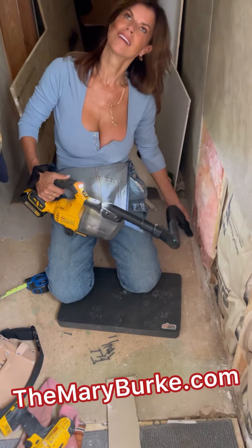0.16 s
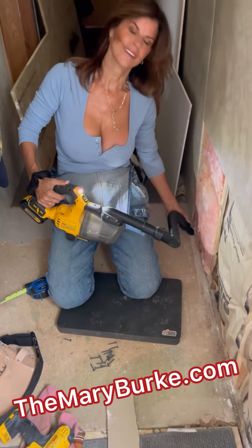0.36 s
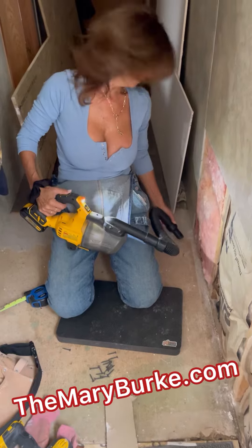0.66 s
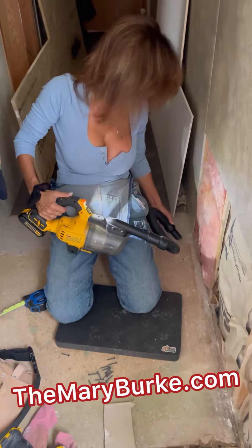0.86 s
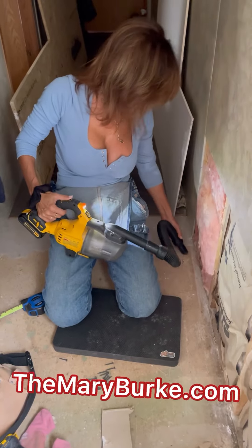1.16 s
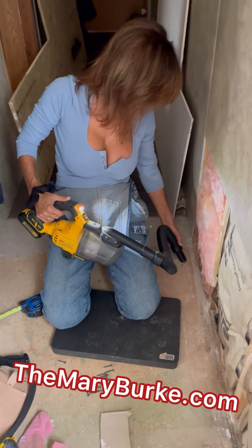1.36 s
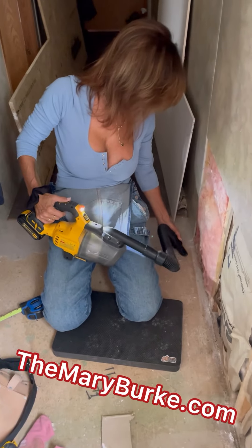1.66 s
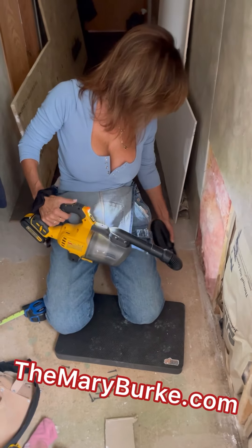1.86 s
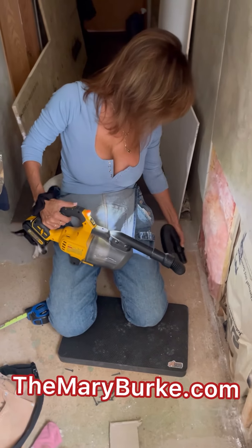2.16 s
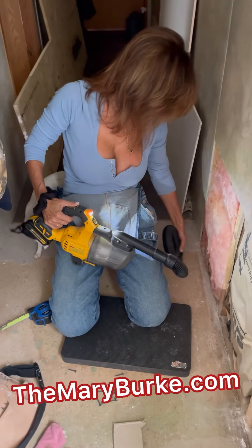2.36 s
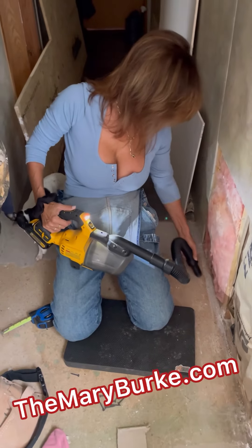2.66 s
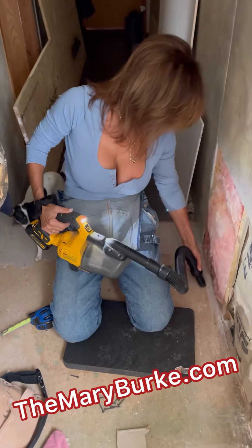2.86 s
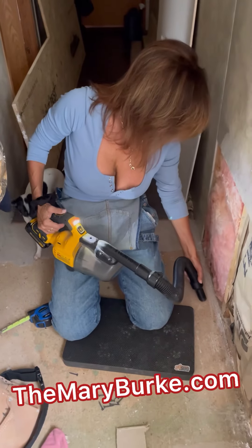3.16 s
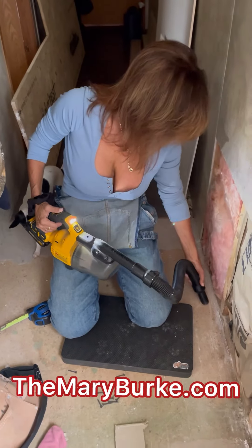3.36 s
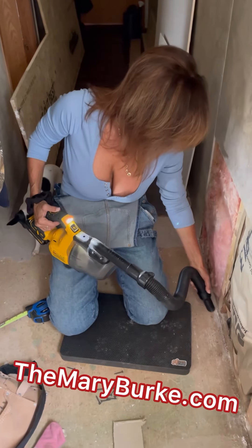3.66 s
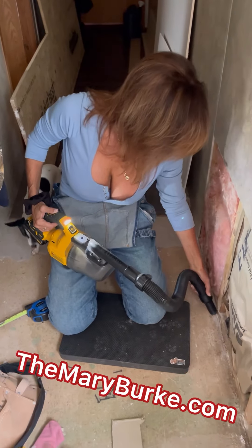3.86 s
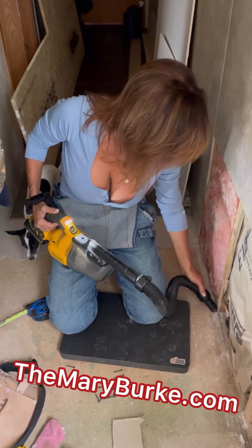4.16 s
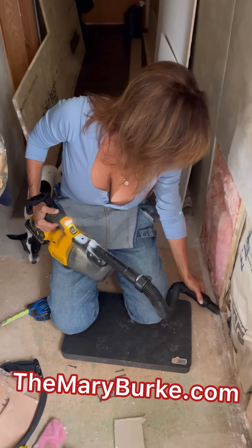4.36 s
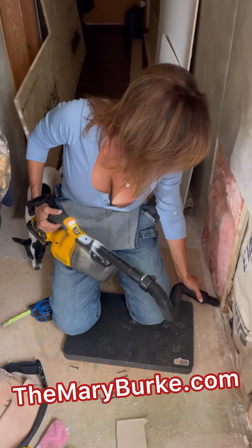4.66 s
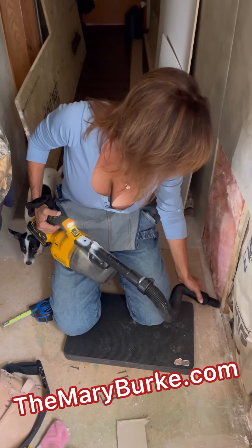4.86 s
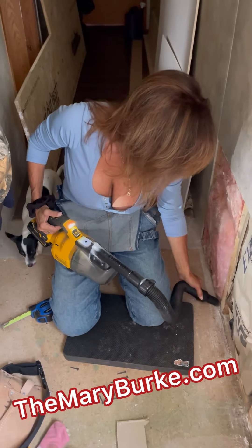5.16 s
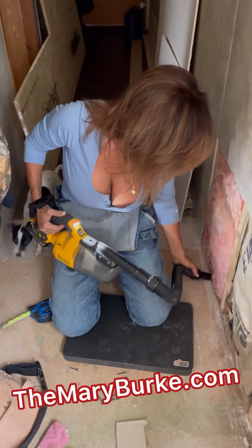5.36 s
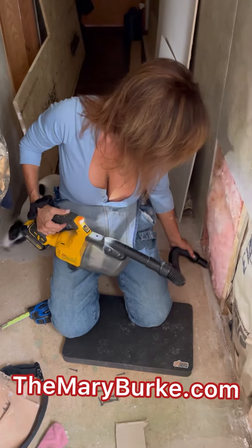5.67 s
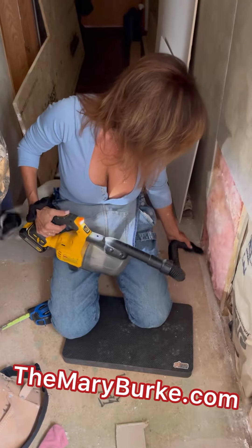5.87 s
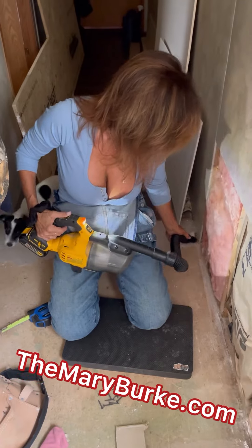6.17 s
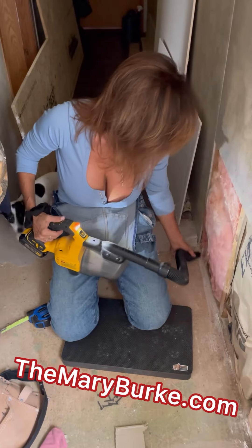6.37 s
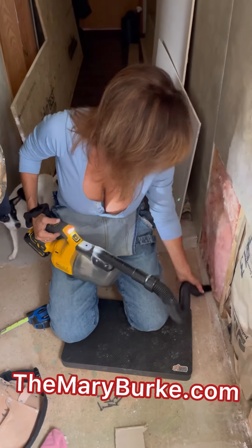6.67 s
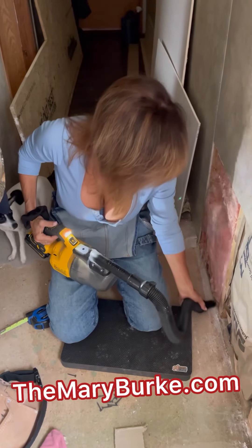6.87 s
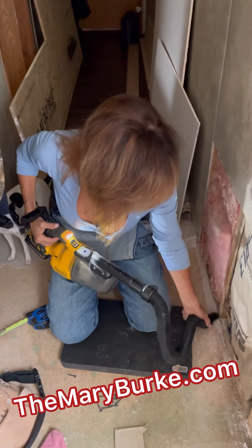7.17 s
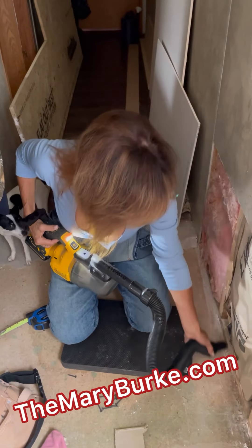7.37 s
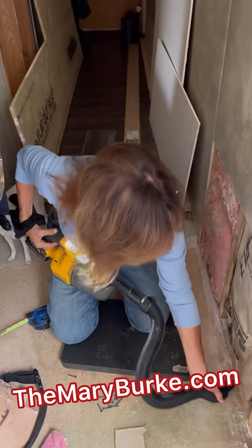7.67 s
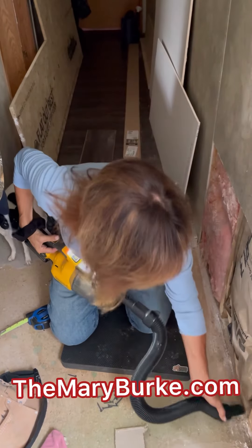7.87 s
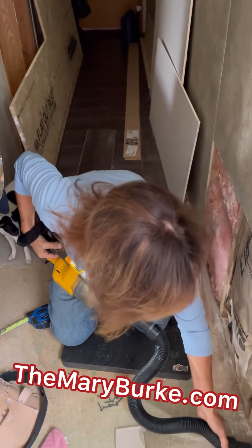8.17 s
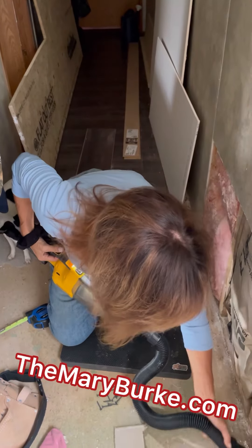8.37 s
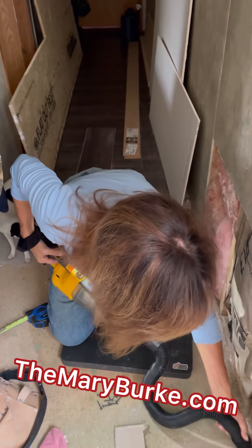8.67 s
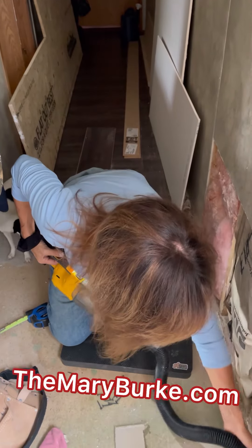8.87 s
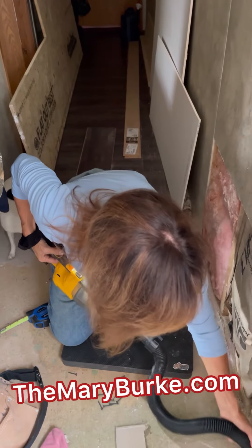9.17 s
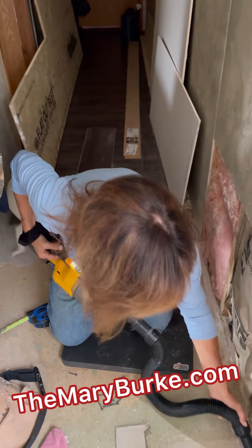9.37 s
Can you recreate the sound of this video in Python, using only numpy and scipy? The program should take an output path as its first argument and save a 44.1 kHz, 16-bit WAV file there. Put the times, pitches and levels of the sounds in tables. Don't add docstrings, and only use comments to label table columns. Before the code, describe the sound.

A small cordless vacuum runs steadily up close, its thin high motor whine riding on rushing air, with soft low hose and knee bumps on the floor.

```python
import sys
import numpy as np
from scipy import signal
from scipy.fft import rfft, irfft, next_fast_len
from scipy.io import wavfile
from scipy.ndimage import uniform_filter1d, map_coordinates

SR = 44100
rng = np.random.default_rng(int(sys.argv[2]) if len(sys.argv) > 2 else 0)


def attenuation_scalar(level_db):
    decades = np.asarray(level_db, float) / 20
    return 10 ** decades


def unload_wav(signal):
    wavfile.write(
        sys.argv[1],
        SR,
        np.round(np.clip(np.atleast_2d(signal).T, -1, 1) * 32767).astype(np.int16),
    )


N = 419821
TOP_HZ = 15800

# t/s, exhaust facing the phone/0-1, body leaning over the tool/0-1,
# nozzle swing/relative, hose bend/relative
POSTURE = [(0.0, 0.9, 0.28, 0.3, -1.1), (0.75, 0.92, 0, 0.4, .4), (1.25, .57, 0.1, 0, 0.3),
           (1.75, 0.56, 0, -.7, 1.4), (2.25, 0.46, 0.1, 1.3, 0.9), (2.75, 0.09, .17, 1, 2),
           (3.5, 0, 0, 0.5, 0.6), (4.0, 0.13, 0, 0.7, -1), (5.0, 0, 0.04, 0.3, -0.6),
           (5.75, 0.15, 0.12, -1, -0.2), (6.25, 0.3, 0.14, -1.3, 1.2), (6.75, 0, .06, 0.5, -0.8),
           (7.25, 0, 0.2, 1.8, -0.5), (7.75, 0.38, 0.6, -1.5, -1), (8.0, .06, 0.82, -0.8, 0.9),
           (8.75, 0, 1.04, 0.4, -0.7), (9.52, .02, 0.86, -1, 0)]

# level/dB, then change/dB per facing, lean, swing and bend
HOUSING_LEVELS = [(-37.5, 3.5, 5, .4, 1.2), (-30.5, -6.5, -5, 0.057, 0.56), (-34.5, 8, 2.5, -0.24, 1.1),
                  (-29.5, -3, -6.5, 0.7, 0.18)]
VENT_LEVELS = [(-37, -7, -11, -3, 0.5), (-36, 7, -3, -.3, 0.4), (-48, 12.5, -13, 8, -2),
               (-38.5, -17, 0.5, 3, 2.2)]
HOSE_LEVELS = [(-29.5, -7.5, -2.5, 0.33, -0.54), (-38.5, -9, 4, 1.5, -0.071), (-37.5, -4, -5.5, 1.5, -1.5),
               (-46, 6.5, 7, 1.1, -1.6)]
JET_LEVEL = (-44, .7, -2.6, 0.17, 0.27)
RUMBLE_LEVEL = (-40, 0, -2, 0.15, 0)
HUM_LEVEL = (-35.5, -5, -3, 0.3, 0)

# start f/Hz, end f/Hz, width/Hz
HOUSING_MODES = [(991, 987, 214), (1365, 1331, 190), (1630, 1528, 334), (1887, 1893, 236)]
VENT_MODES = [(550, 550, 38), (2180, 2150, 180), (3000, 3000, 320), (3690, 3780, 250)]
HOSE_MODES = [(2500, 2490, 300), (3530, 3520, 240), (4310, 4460, 340), (5090, 5270, 340)]

# f/Hz, level/dB per Hz
JET_ROAR = [(600, -9), (720, -14), (850, -6), (1200, -5.5), (2200, -1.5), (2800, 1), (3300, -1), (4000, -3),
            (4800, -8), (5600, -7.5), (6200, -5), (6600, -30.5)]
JET_HISS = [(5900, -40), (6300, -2), (6600, -2), (7000, 0), (7450, -5), (7800, -3), (9000, -1.5),
            (9800, -9), (10500, -11), (12000, -15), (12600, -17), (13300, -16.5), (15700, -11)]
CANISTER = [(30, -47), (50, -34), (70, -26), (140, -22.5), (300, -18), (430, -14.5), (600, -21), (700, -18),
            (900, -73)]
# f/Hz, width/Hz, level/dB
HALL = [(180, 19, 14), (232, 73, 7.5), (328, 15, 6), (367, 41, -0.5), (460, 108, 8)]
# t/s, swell level/dB
DRAGS = [(1.85, 0.5), (2.8, 0), (3.74, -3), (4.42, 1.4), (4.96, 0.5), (5.34, 3.5), (5.59, 3.5), (5.81, 5),
         (6.36, 1.5), (6.55, 6.5), (7.39, 3.5), (7.6, 1)]
# t/s, peak level/dB, f/Hz
BUMPS = [(2.25, -45, 95), (2.535, -39, 74), (3.652, -46, 89), (5.694, -35.5, 113), (5.777, -32, 180),
         (6.223, -41.5, 65), (6.468, -31.5, 173), (6.599, -41, 180), (7.7, -34, 179), (7.751, -37, 184),
         (7.88, -60, 60), (8.29, -49, 60)]

# t/s, f/Hz
SPEED = [(0, 6112), (0.3, 6109), (0.65, 6093), (1.0, 6089.5), (2.1, 6099.5), (2.45, 6108.5), (2.75, 6108.5),
         (3.05, 6100), (4.55, 6099), (5.15, 6088), (5.6, 6092), (6.05, 6109.5), (6.9, 6113.5), (7.3, 6109),
         (8.05, 6112), (8.5, 6086), (9.0, 6081), (9.52, 6064)]
# t/s, level/dB
WHINE = [(0.0, -42), (0.62, -36), (1.44, -36.5), (1.74, -31.5), (2.1, -38.5), (2.9, -35.5), (3.6, -38.5),
         (4.3, -39.5), (5.1, -43), (5.55, -36.5), (5.8, -41), (6.45, -37), (7.0, -40.5), (7.5, -45),
         (8.05, -38.5), (9.0, -36), (9.52, -42)]
# multiple of the shaft turns/count, level/dB
OVERTONES = [(21, -62), (24, -65), (25, -70), (26, -73), (28, -62), (30, -74), (31, -72), (33, -73),
             (34, -70), (35, -66), (36, -69)]
# t/s, depth level/dB, half length/s
NULLS = [
    (0.3, 9, .13),
    (2.16, 9, .06),
    (3.37, 9, .07),
    (4.78, 4, .25),
    (5.66, 7, .04),
    (5.98, 6, .05),
    (7.18, 9, .07),
    (7.8, 7, .1),
    (8.32, 3, .05),
]
# centre t/s, half length/s, level/dB
BEAMS = [
    (0.42, .38, -26.5),
    (1.3, .42, -31),
    (2.25, .4, -26),
    (3.1, .2, -36),
    (4.25, .4, -33),
    (5.95, .27, -32),
    (7.15, .15, -36),
    (7.65, .12, -35),
    (9.37, .22, -32),
]

# f/Hz, likeness/0-1
ALIKE = [(150, 1), (300, .997), (750, .92), (1300, .94), (2100, .8), (3600, .5), (5600, .8), (6600, .94),
         (7300, .993), (8000, .993), (9000, .86), (11000, .985), (12700, .78), (14000, .98)]
# f/Hz, lead/rad
LEAD = [(250, 0), (1640, .3), (2100, .15), (2500, 1.7), (3000, 1.1), (4480, .8), (5000, -.2), (5550, .2),
        (6100, 1.5), (6700, 2.35), (7750, 3.14), (9000, 4.25), (9600, 5.3), (11000, 6.28),
        (11700, 6.8), (12300, 7.5), (13000, 8.45), (14100, 9.42), (14900, 9.9), (15300, 10.48),
            (15800, 10.62)]
# f/Hz, level/dB
TILT = [(100, 0), (210, .5), (500, 1.2), (770, 3.5), (1170, 4.7), (1790, 2.6), (2500, -1), (3200, .3),
        (5000, 0)]


def unit(x):
    return x / np.sqrt(np.mean(x ** 2) + 1e-20)


def along(points, hz):
    f, v = np.transpose(points)
    return np.interp(np.log(hz + 1), np.log(f + 1), v)


def curve(points):
    s, v = np.transpose(points)
    return np.interp(np.arange(N) / SR, s, v)


def wobble(rate):
    knots = rng.standard_normal(int(N * rate / SR) + 4)
    return map_coordinates(knots, [np.arange(N) * rate / SR])


def filtered(x, response):
    m = next_fast_len(N + 8192)
    spectrum = rfft(x, m) * response(np.fft.rfftfreq(m, 1 / SR))
    return irfft(spectrum, m)[..., :N]


def posed(level):
    s, *controls = np.transpose(POSTURE)
    return np.interp(np.arange(N) / SR, s, level[0] + np.dot(level[1:], controls))


def patches(shape, bins, frames):
    field = uniform_filter1d(rng.standard_normal(shape), size=bins, axis=0)
    field = uniform_filter1d(field, size=frames, axis=1)
    return unit(uniform_filter1d(field, size=frames, axis=1))


def turbulence(power, patchy_db, ripple_db):
    hz, s, z = signal.stft(rng.standard_normal((2, N)), SR, nperseg=2048)
    gusts = patchy_db * patches(z.shape[1:], bins=12, frames=4)
    ripple = ripple_db * patches(z.shape[1:], bins=2, frames=16)
    z = z * attenuation_scalar(gusts + ripple) * np.sqrt(power(hz[:, None], s))
    return signal.istft(z, nperseg=2048)[1][:, :N]


def mains():
    phase = 2 * np.pi * 49 * np.arange(N) / SR + 0.7 * wobble(14)
    return attenuation_scalar(-60.5 + 3.2 * wobble(18)) * np.sin(phase)


def bumps():
    out, t = np.zeros(N + SR), np.arange(SR // 5) / SR
    onset = 1 - np.exp(-t / 0.0087)
    for s, db, hz in BUMPS:
        fade = attenuation_scalar(db + 6.5 - 60 * t / 0.18)
        out[round(s * SR):][:len(t)] += fade * onset * np.sin(2 * np.pi * hz * t)
    return out[:N]


def rumble():
    t, drag_s = np.arange(N) / SR, 0.062
    swell_db = sum(db * np.exp(-((t - s) / drag_s) ** 2) for s, db in DRAGS)
    level_db = posed(RUMBLE_LEVEL) + swell_db

    def colour(f):
        hall = 1 + sum(attenuation_scalar(db) / (1 + (2 * (f - c) / w) ** 2) for c, w, db in HALL)
        return attenuation_scalar(along(CANISTER, f)) * hall

    noise = turbulence(lambda hz, s: 1, patchy_db=1.0, ripple_db=1.24)
    return attenuation_scalar(level_db + 4.5) * unit(filtered(noise, colour))


def jet():
    def roar_power(hz, s):
        return attenuation_scalar(along(JET_ROAR, hz)) ** 2 * np.minimum(hz / 600, 1) ** 6

    def hiss_power(hz, s):
        return attenuation_scalar(along(JET_HISS, hz)) ** 2 * (hz > 5900)

    level_db = posed(JET_LEVEL)
    roar = turbulence(roar_power, patchy_db=1.5, ripple_db=3.0)
    hiss = turbulence(hiss_power, patchy_db=1.3, ripple_db=1.7)
    return attenuation_scalar(level_db + 0.34 * wobble(8)) * (attenuation_scalar(16.0) * unit(roar) + attenuation_scalar(8.5) * unit(hiss))


def ringing(hz, s, modes, levels, trim_db):
    power, at = 0, np.minimum(s * SR, N - 1).astype(int)
    for (start, end, width), level in zip(modes, levels):
        drift = start + (end - start) * s * SR / N
        centre = drift * (1 + 0.005 * wobble(1.1)[at])
        band = (hz * width) ** 2 / ((centre ** 2 - hz ** 2) ** 2 + (hz * width) ** 2)
        band = band ** 2
        power = power + attenuation_scalar(posed(level)[at] + trim_db) ** 2 * band / band.mean(axis=0)
    return power


def duct_power(hz, s):
    housing = ringing(hz, s, HOUSING_MODES, HOUSING_LEVELS, trim_db=0.07)
    vents = ringing(hz, s, VENT_MODES, VENT_LEVELS, trim_db=-1.5)
    hose = ringing(hz, s, HOSE_MODES, HOSE_LEVELS, trim_db=0.62)
    return housing + vents + hose


def air():
    return jet() + rumble() + turbulence(duct_power, patchy_db=0.62, ripple_db=3.0)


def motor():
    t = np.arange(N) / SR
    turn = 2 * np.pi * np.cumsum(curve(SPEED)) / SR / 14 + 0.008 * wobble(25)

    def tone(order, db):
        return np.sqrt(2) * attenuation_scalar(db) * np.sin(order * turn)

    hum = tone(order=1, db=posed(HUM_LEVEL) - 0.7 + 0.82 * wobble(16))
    beam = attenuation_scalar(-48) + sum(attenuation_scalar(db) * np.exp(-((t - s) / half) ** 4) for s, half, db in BEAMS)
    blades = beam * tone(order=7, db=-11 + 1.7 * wobble(12))
    whine_db = curve(WHINE) - sum(db * np.exp(-((t - s) / half) ** 2) for s, db, half in NULLS)
    overshoot_db = 0.3 * (whine_db + 37)
    whine = tone(order=14, db=whine_db + overshoot_db + 3.0 + 1.8 * wobble(11))
    high = sum(tone(k, db + 3.2 * wobble(1.5)) for k, db in OVERTONES)
    return hum + blades + whine + high


def ports(shared, apart):
    def mixing_angle(f):
        return np.arccos(np.clip(along(ALIKE, f), -1, 1)) / 2

    def lead(f):
        return np.exp(0.5j * along(LEAD, f)) * attenuation_scalar(along(TILT, f) / 2)

    common = filtered(shared, lambda f: np.cos(mixing_angle(f)))
    odd = filtered(apart, lambda f: np.sin(mixing_angle(f)))
    left = filtered(common + odd, lead)
    right = filtered(common - odd, lambda f: 1 / lead(f))
    return np.array([left, right])


def scene():
    near, scattered = air()
    return ports(mains() + bumps() + near + motor(), scattered)


def low_pass(x):
    return signal.sosfilt(signal.butter(12, 15870, fs=SR, output="sos"), x)


def record(dry):
    mix = filtered(dry, lambda hz: hz < TOP_HZ)
    return low_pass(mix)


dry = scene()
out = record(dry)
unload_wav(out)
```